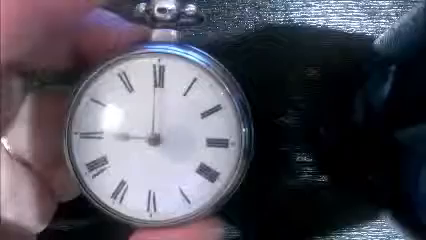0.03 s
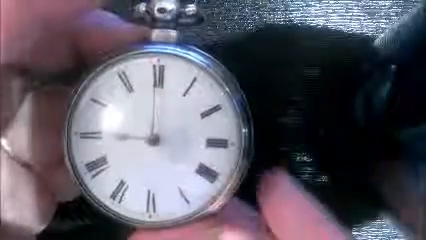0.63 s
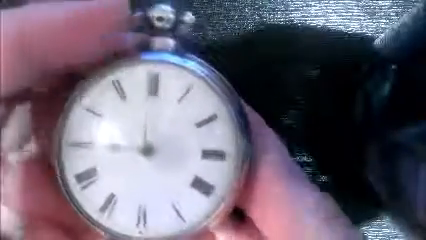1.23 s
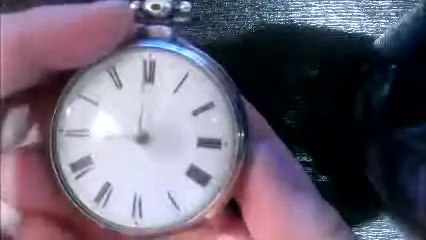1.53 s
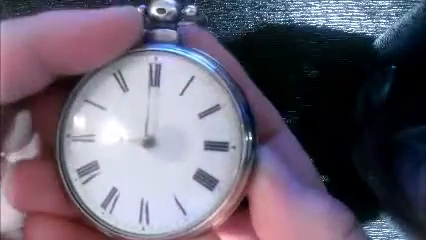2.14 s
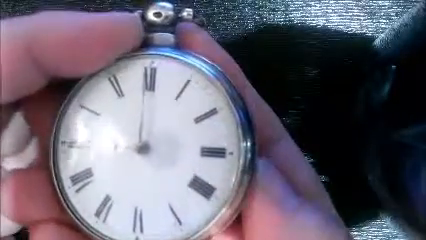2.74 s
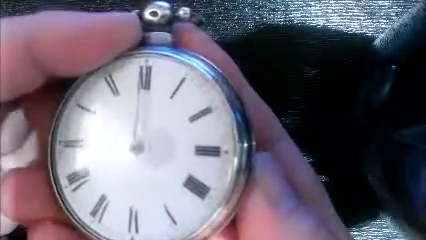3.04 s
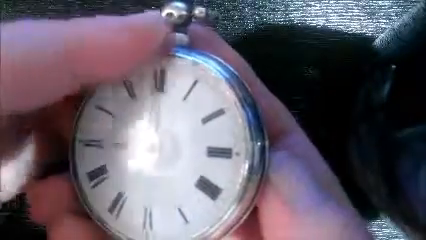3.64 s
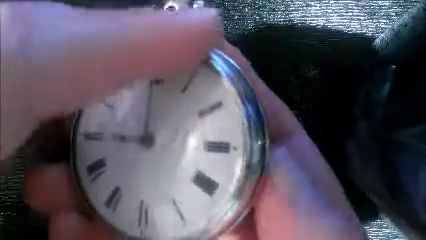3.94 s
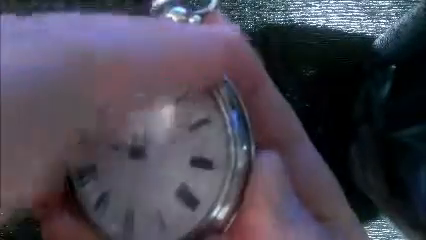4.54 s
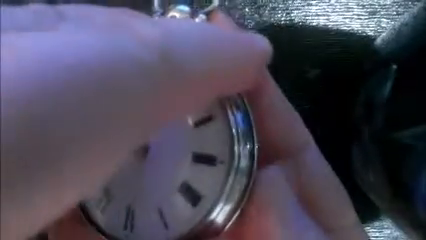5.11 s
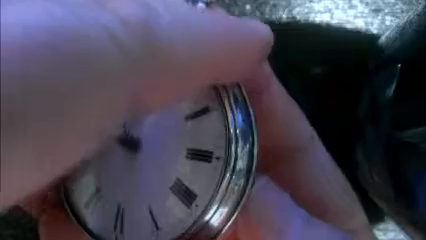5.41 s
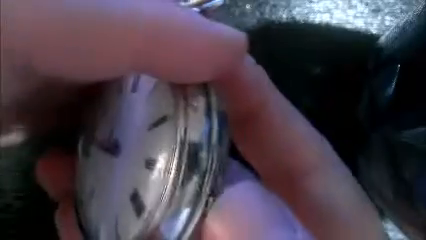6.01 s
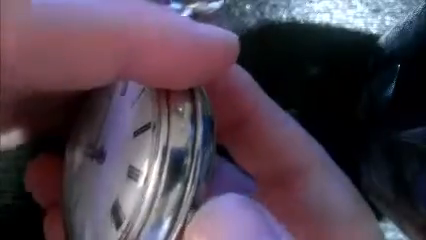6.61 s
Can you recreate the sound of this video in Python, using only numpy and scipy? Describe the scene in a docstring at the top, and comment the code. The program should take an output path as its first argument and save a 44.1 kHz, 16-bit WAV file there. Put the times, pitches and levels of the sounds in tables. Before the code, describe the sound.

A close, hissy microphone switches on with a thump, much louder than anything that follows. An old pocket watch then ticks faintly, about five times a second, with a light metallic ring. Fingers slide softly over the case and make it click now and then, most sharply about halfway through. The ticks turn slightly duller as the watch is turned. A low hum and faint electrical whine run underneath.

```python
"""An old pocket watch ticks about five times a second in a hand, close to a cheap, hissy microphone.
Its two pallets knock the movement in turn and rattle the case. The microphone comes on with a thump;
a low machine hum and a faint electrical whine run under the ticks. Fingers slide over the case
and make it click now and then as the watch is turned."""
import sys
import numpy as np
from scipy import signal
from scipy.fft import rfft, irfft
from scipy.io import wavfile

SR = 44100
rng = np.random.default_rng(int(sys.argv[2]) if len(sys.argv) > 2 else 0)


def pcm_store(signal):
    """Save signal as 16-bit PCM."""
    levels = np.round(np.clip(np.atleast_2d(signal), -1, 1) * 32767)
    wavfile.write(sys.argv[1], SR, levels.astype(np.int16).T)


N = 298116
TIME = np.arange(N) / SR

# watch resonances, low to high: pitch_hz, width_hz, gain_db
RING_MODES = [(3600, 170, -8), (4080, 690, 13), (4330, 71, 0)]
EDGE_MODES = [(5330, 250, 1), (5800, 420, 1)]
SPARKLE_MODES = [(8490, 890, 7), (9700, 1100, -2.5), (12000, 6100, -12)]
# electrical whine: pitch_hz, rms_db, wander_hz
WHINE = [(942, -88, 1), (2707, -74.5, 2.5), (7900, -97, 2), (8000, -92, 1), (8100, -99, 2),
         (13235, -80, 15)]


def from_db(db):
    """Decibels to gain."""
    return 10 ** (np.asarray(db) / 20)


def rms_one(x):
    """Scale to rms 1."""
    return x / np.sqrt(np.mean(x ** 2) + 1e-20)


def level_curve(rows):
    """Gain over time from rows of time_s, level_db."""
    return from_db(np.interp(TIME, *np.transpose(rows)))


def add(track, start_s, sound):
    """Mix a short sound into the track."""
    start = int(start_s * SR)
    track[start:start + len(sound)] += sound[:max(N - start, 0)]


def noise(spectrum):
    """Steady noise from rows of freq_hz, density_db; rms 1."""
    hz, db = np.transpose(spectrum)
    bins_hz = np.maximum(np.arange(N // 2 + 1) * SR / N, 1)
    shape = from_db(np.interp(np.log(bins_hz), np.log(hz), db))
    return rms_one(irfft(rfft(rng.standard_normal(N)) * shape, N))


def drift(rate_hz):
    """Random line with rate_hz knots a second; rms 1."""
    knots = rng.standard_normal(int(rate_hz * N / SR) + 2)
    return rms_one(np.interp(TIME * rate_hz, np.arange(len(knots)), knots))


def tones(lines, waver_db=0.5):
    """Sines wavering slightly in pitch and level."""
    out = 0
    for hz, rms_db, wander_hz in lines:
        phase = 2 * np.pi * np.cumsum(hz + wander_hz * drift(8 * wander_hz + 1)) / SR
        out = out + np.sqrt(2) * from_db(rms_db + waver_db * drift(3)) * np.sin(phase)
    return out


def resonate(x, modes):
    """Parallel resonators (pitch_hz, width_hz, gain_db), signs alternating; rms 1."""
    out = 0
    for k, (hz, width_hz, db) in enumerate(modes):
        r = np.exp(-np.pi * width_hz / SR)
        poles = [1, -2 * r * np.cos(2 * np.pi * hz / SR), r * r]
        out = out + (-1) ** k * from_db(db) * signal.lfilter([1 - r, 0, r - 1], poles, x)
    return rms_one(out)


def steep_modes(x, modes):
    """Each resonator run twice at double width, for deep valleys between modes; rms 1."""
    out = 0
    for hz, width_hz, db in modes:
        wide = [(hz, 2 * width_hz, 0)]
        out = out + from_db(db) * resonate(resonate(x, wide), wide)
    return rms_one(out)


def contact(chatter_s, chatter_db, tail_s, tail_db):
    """Contact force: a strike, fast chatter, a faint settling tail."""
    t = TIME[:SR // 20]
    envelope = from_db(chatter_db) * np.exp(-t / chatter_s) + from_db(tail_db) * np.exp(-t / tail_s)
    force = envelope * rng.standard_normal(len(t))
    force[0] += 1
    return force


def rattle(rise_s, decay_s, tail_s, tail_db):
    """A burst of tiny impacts that builds, then dies away."""
    t = TIME[:SR // 20]
    decay = np.exp(-t / decay_s) + from_db(tail_db) * np.exp(-t / tail_s)
    return (1 - np.exp(-t / rise_s)) * decay * rng.choice([-1, 1], len(t))


def background(hiss_db=-65.0, room_db=-51.5, white_db=-75, bass_hz=110):
    """Room murmur with hum and whine, and microphone hiss; both fade in at switch-on, the bass later."""
    # microphone hiss, room murmur: freq_hz, density_db
    hiss_spectrum = [(300, 3), (1000, 2), (1800, 2), (2350, 1.5), (2800, 0), (3050, -3), (5000, -2.5),
                     (6300, -6), (7750, -17), (8300, -18), (9200, -19), (12000, -21.5), (13700, -15),
                     (14400, -24)]
    room_spectrum = [(14, 3.5), (25, 8.5), (35, 5.5), (62, -5), (80, -13.5), (160, -16), (210, -13.5),
                     (330, -17.5), (390, -23), (440, -17), (480, -23), (540, -15.5), (620, -49.5),
                     (2000, -74)]
    # machine hum: pitch_hz, rms_db, wander_hz
    hum_lines = [(26, -66.5, 0.74), (47.3, -56.5, 0.405), (59.3, -76, 0.9), (102.1, -69.5, 0.28),
                 (110.2, -79, .4)]
    # switch-on fades, overall and bass: time_s, level_db
    fade_in = [(0, -67), (.06, -26), (.085, 1), (.2, 0)]
    bass_fade_in = [(0, -50), (.09, -13), (.38, -12), (.44, 0)]
    room = from_db(room_db) * noise(room_spectrum)
    bass = signal.sosfilt(signal.butter(1, bass_hz, fs=SR, output="sos"), room)
    low = room - bass + level_curve(bass_fade_in) * (bass + tones(hum_lines))
    white_drop = level_curve([(2.08, 0.5), (2.14, -21)])
    white = from_db(white_db) * white_drop * rng.standard_normal(N)
    drone = low + tones(WHINE)
    hiss = from_db(hiss_db) * noise(hiss_spectrum) + white
    gain = level_curve(fade_in)
    return gain * drone, gain * hiss


def dips():
    """Gain for hiss and rubbing: the level dips briefly."""
    # dips: centre_s, length_s, depth_db
    gaps = [(.106, 0.013, 20), (0.572, 0.0098, 14), (0.71, 0.021, 11.5), (.918, 0.0065, 28),
            (1.8, .02, 6.5), (3.021, 0.043, 10), (3.093, 0.035, 28), (4.399, 0.014, 28), (4.473, 0.026, 9),
            (5.21, 0.033, 9), (5.585, 0.011, 17), (6.236, 0.016, 9.5), (6.491, 0.031, 31)]
    return from_db(-sum(db * np.exp(-(2 * (TIME - s) / length_s) ** 4) for s, length_s, db in gaps))


def switch_on_thump(jump_s=0.1223, lead_s=0.0127, rise_s=0.002, decay_s=0.0097, limit=0.5):
    """The input voltage steps, jumps with a crack, saturates and leaks through the coupling capacitor."""
    t = np.maximum(TIME - jump_s, 0)
    leak = np.exp(-t / decay_s)
    step = from_db(-42) * (TIME > jump_s - lead_s) * leak
    swing = (1 - np.exp(-(t / rise_s) ** 2)) * leak
    # the jump sets the highest whine ringing
    whistle = from_db(-63) * np.exp(-t / 0.034) * np.sin(2 * np.pi * WHINE[-1][0] * t)
    force = contact(chatter_s=0.0008, chatter_db=-9, tail_s=0.004, tail_db=-47)
    body = from_db(-57) * steep_modes(force, [(1100, 400, 7), (1500, 220, -7)])
    crack = np.zeros(N)
    add(crack, jump_s, body + from_db(-50) * force)
    return step + crack + whistle - limit * np.tanh(swing / limit)


def finger_rub(attack_s=0.019, release_s=0.039, grain_db=2.0, grain_hz=120):
    """Skin slides on the case: a soft, grainy hiss that swells, holds and fades with each stroke."""
    # finger strokes: start_s, length_s, level_db
    strokes = [(0.196, .25, -66), (0.724, 0.49, -63.5), (1.48, 0.068, -68.5), (1.91, 0.018, -67.5),
               (2.755, 0.036, -70.5), (3.626, 0.13, -69), (4.03, .07, -72), (4.86, 0.055, -68.5),
               (5.308, 0.032, -70), (5.72, 0.22, -74), (6.157, .035, -71), (6.6, 0.11, -75)]
    # skin on metal: freq_hz, density_db
    rub_spectrum = [(700, -28), (1500, -3), (2800, 1.5), (4000, 1), (4800, 3.5), (5450, 4.5), (6200, -2.5),
                    (7000, -11), (9000, -16), (15000, -29)]
    envelope = 0
    for start_s, length_s, level_db in strokes:
        before = np.maximum(start_s - TIME, 0) / attack_s
        after = np.maximum(TIME - start_s - length_s, 0) / release_s
        envelope = envelope + from_db(level_db) * np.exp(-before - after)
    return envelope * noise(rub_spectrum) * from_db(grain_db * drift(grain_hz))


def escapement(usual_knock_db=-62.5, width_hz=430, turn_start_s=4.1, turn_length_s=1.5):
    """The pallets knock the movement in turn; their rattle excites the higher modes of the case."""
    # beats: start_s, knock_db
    beats = [(.312, -67.5), (.5114, -63), (.7309, -66), (.9316, -63.5), (1.1506, -60), (1.3355, -61),
             (1.553, -66), (1.7511, -59.5), (1.9711, -63), (2.1644, -64), (2.383, -64.5), (2.5847, -67.4),
             (2.8053, -68.5), (3.0004, -69), (3.2141, -64), (3.4154, -64.5), (3.6346, -69), (3.834, -59.8),
             (4.0432, -66), (4.2405, -63.5), (4.4564, -65), (4.652, -69), (4.8575, -73), (5.051, -68),
             (5.2648, -63.5), (5.46, -69), (5.6679, -62), (5.8573, -66), (6.0744, -60.5), (6.266, -73.5),
             (6.4832, -67.5), (6.6605, -72)]
    # tick and tock pallets on a usual beat: pitch_hz, ring_db, turn_ring_db, edge_db, sparkle_db
    pallets = [(2440, -70.5, 1, -72.5, -79), (2500, -74.5, 5.5, -70.5, -85.5)]
    out = np.zeros(N)
    for k, (start_s, knock_db) in enumerate(beats):
        pitch_hz, ring_db, turn_ring_db, edge_db, sparkle_db = pallets[k % 2]
        # the hand turns the watch: lower knock, more ring, duller top
        turned = np.clip((start_s - turn_start_s) / turn_length_s, 0, 1)
        pitch_hz -= 250 * turned
        ring_db += turn_ring_db * turned
        extra_db = knock_db - usual_knock_db   # reaches the high modes only in part
        edge_db += 0.19 * extra_db - 4.5 * turned
        sparkle_db += 0.68 * extra_db - turned
        knock = contact(chatter_s=0.0017, chatter_db=-21, tail_s=0.013, tail_db=-28.5)
        burst = rattle(rise_s=0.0012, decay_s=0.0013, tail_s=0.0091, tail_db=-10)
        snap = rattle(rise_s=0.00065, decay_s=0.0022, tail_s=0.0092, tail_db=-11)
        body = from_db(knock_db) * steep_modes(knock, [(pitch_hz, width_hz, 0)])
        ring = from_db(ring_db) * steep_modes(burst, RING_MODES)
        edge = from_db(edge_db) * steep_modes(burst, EDGE_MODES)
        sparkle = from_db(sparkle_db) * steep_modes(snap, SPARKLE_MODES)
        add(out, start_s, body + ring + edge + sparkle)
    return out


def case_clicks(shimmer_db=-38, shimmer_s=0.09):
    """The case shifts under the grip: sharp clicks; a few tones ring on after the hardest."""
    # clicks: start_s, gain_db, bright_db
    clicks = [(1.1875, -45, -34), (2.3325, -51, -24), (3.675, -33.5, -18), (3.99, -39.5, -31),
              (4.119, -50, -28), (4.342, -47, -36), (5.7416, -48, -25), (6.596, -48, -29),
              (6.721, -52, -28)]
    # two case modes, then a thin, very high whistle: pitch_hz, gain_db, t60_s
    after_tones = [(3450, -28, 0.19), (4730, -21, 0.078), (13260, -27, 0.22)]
    out, t = np.zeros(N), TIME[:SR // 5]
    for start_s, gain_db, bright_db in clicks:
        burst = rattle(rise_s=0.0006, decay_s=0.0013, tail_s=0.006, tail_db=-27)
        knock = contact(chatter_s=0.0018, chatter_db=-21, tail_s=0.0059, tail_db=-32)
        body = from_db(-22) * steep_modes(knock, [(2370, 600, -5), (1370, 120, -16.5)])
        ring = from_db(-28) * steep_modes(burst, RING_MODES)
        edge = from_db(-12) * steep_modes(burst, EDGE_MODES)
        sparkle = from_db(-10) * steep_modes(burst, SPARKLE_MODES)
        add(out, start_s, from_db(gain_db) * (body + ring + from_db(bright_db) * (edge + sparkle)))
    hardest_s, hardest_db, _ = max(clicks, key=lambda click: click[1])
    for hz, tone_db, t60_s in after_tones:
        envelope = from_db(hardest_db + tone_db - 60 * t / t60_s)
        add(out, hardest_s, envelope * np.sin(2 * np.pi * hz * t))
    # crowded high modes merge into a shimmer
    shimmer = resonate(rng.standard_normal(len(t)), [(9350, 3300, 4), (13600, 2500, -11)])
    add(out, hardest_s, from_db(hardest_db + shimmer_db) * np.exp(-t / shimmer_s) * shimmer)
    return out


def thin_tones(rise_s=0.0089):
    """Three brief, thin tones swell and fade just after ticks."""
    # tones: start_s, gain_db, pitch_ratio, upper_db
    events = [(2.996, -58, 1.03, -26), (4.456, -61.5, 1.03, -2), (6.478, -58, 1, -0.5)]
    # lower and upper partials: pitch_hz, gain_db
    lower_partials = [(2250, -3), (2430, -8.5), (2600, 5)]
    upper_partials = [(3930, 0), (4000, -2), (4340, -2)]
    out, t = np.zeros(N), TIME[:SR // 10]
    envelope = t / rise_s * np.exp(1 - t / rise_s)
    for start_s, gain_db, pitch_ratio, upper_db in events:
        phase_per_hz = 2 * np.pi * pitch_ratio * t
        lower = sum(from_db(db) * np.sin(hz * phase_per_hz) for hz, db in lower_partials)
        upper = sum(from_db(db) * np.sin(hz * phase_per_hz) for hz, db in upper_partials)
        add(out, start_s, from_db(gain_db) * envelope * (lower + from_db(upper_db) * upper))
    return out


def finger_knock(start_s=5.088, pitch_hz=790, level_db=-61, decay_s=0.0055):
    """A fingertip settles on the case with one dull knock."""
    age = np.maximum(TIME - start_s, 0) / decay_s
    return from_db(level_db) * age * np.exp(1 - age) * np.sin(2 * np.pi * pitch_hz * TIME)


def scene():
    """Watch and hand over hum and hiss, mono."""
    drone, hiss = background()
    watch = escapement() + case_clicks() + finger_knock()
    return (watch + thin_tones() + switch_on_thump() + drone + dips() * (hiss + finger_rub()))[None]


def record(dry):
    """Steep low-pass."""
    cutoff_hz = 15750
    return signal.sosfilt(signal.ellip(10, 0.1, 80, cutoff_hz, fs=SR, output="sos"), dry)


dry = scene()
out = record(dry)
pcm_store(out)
```